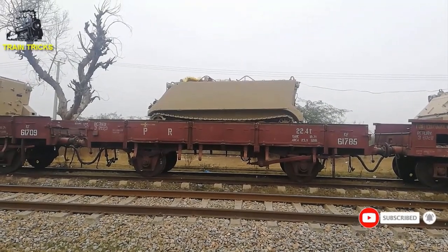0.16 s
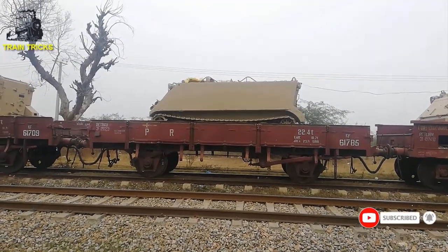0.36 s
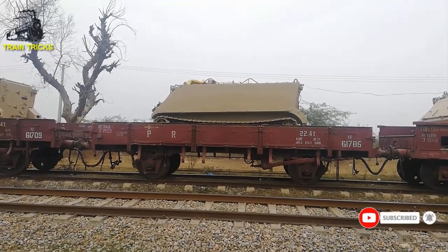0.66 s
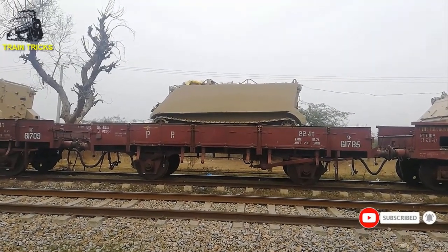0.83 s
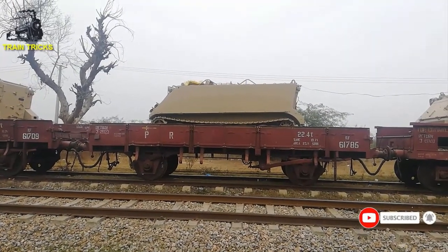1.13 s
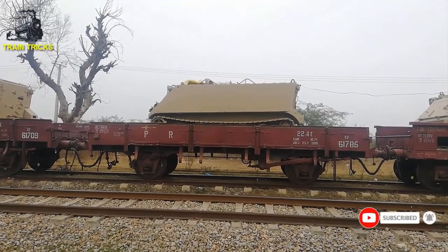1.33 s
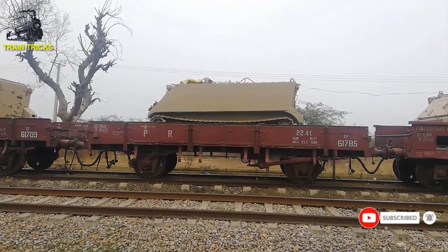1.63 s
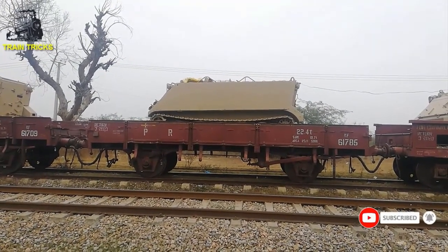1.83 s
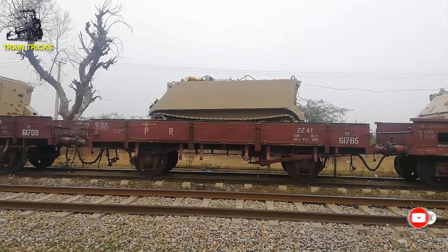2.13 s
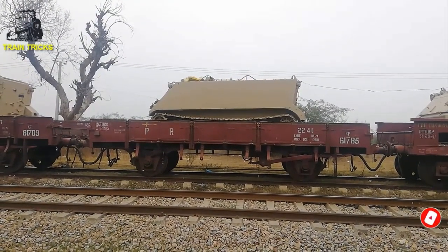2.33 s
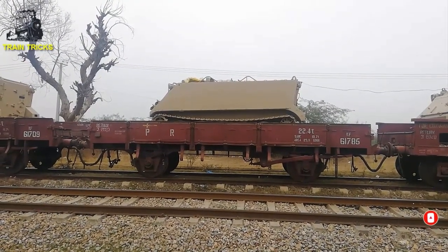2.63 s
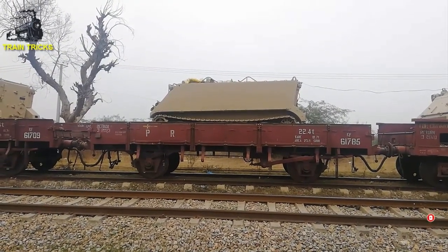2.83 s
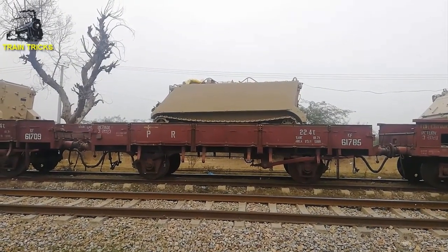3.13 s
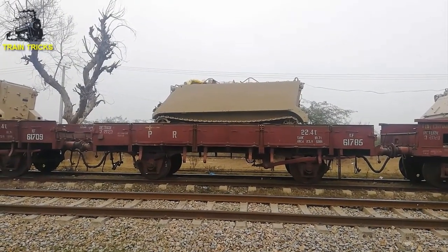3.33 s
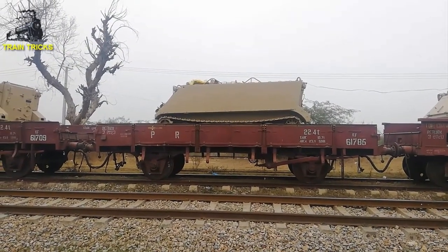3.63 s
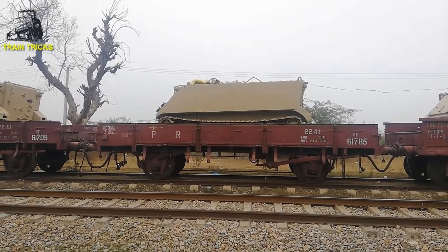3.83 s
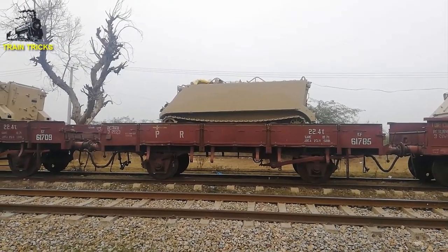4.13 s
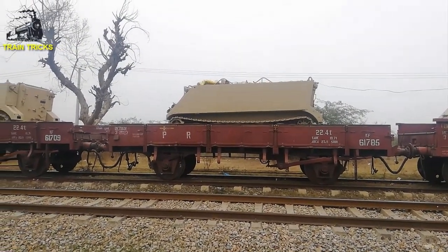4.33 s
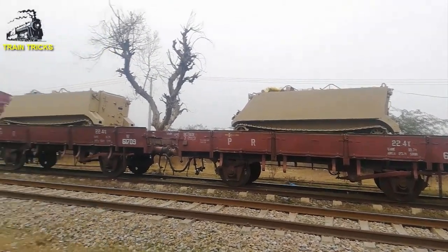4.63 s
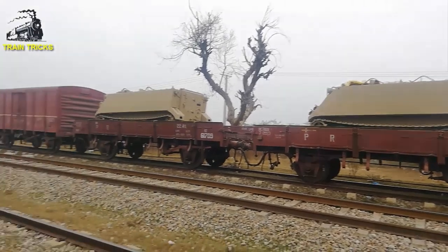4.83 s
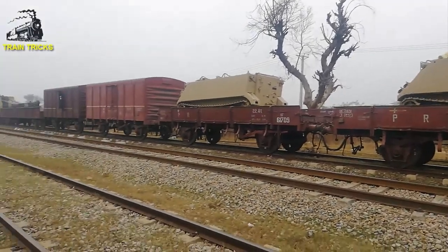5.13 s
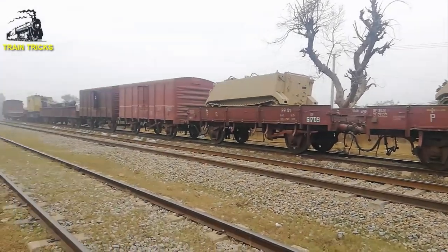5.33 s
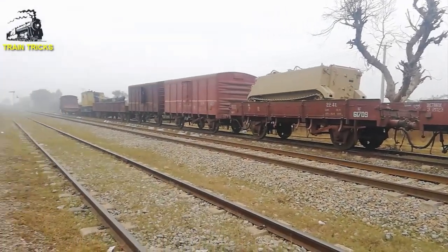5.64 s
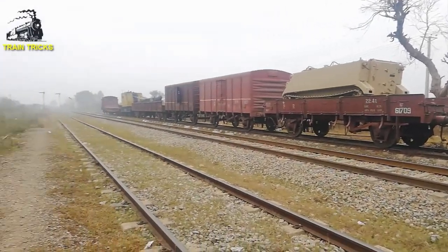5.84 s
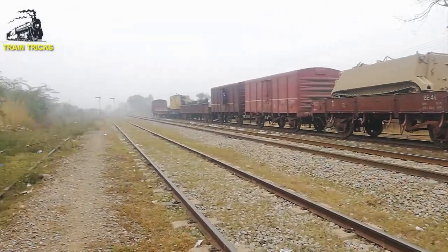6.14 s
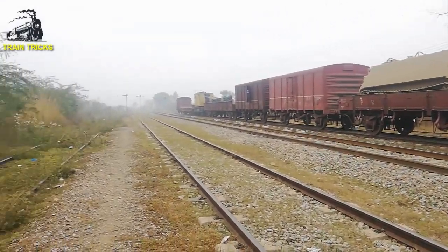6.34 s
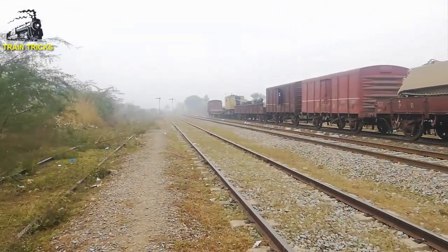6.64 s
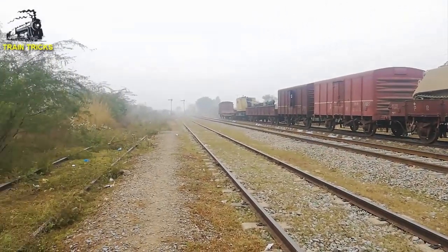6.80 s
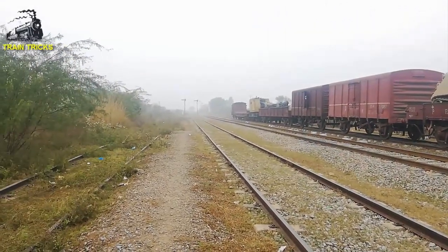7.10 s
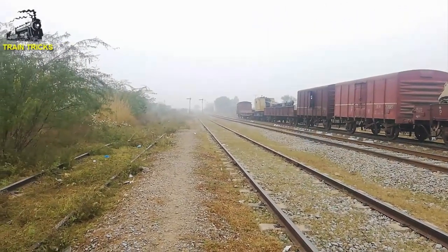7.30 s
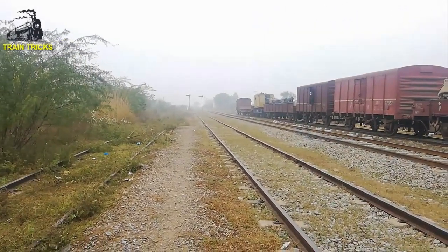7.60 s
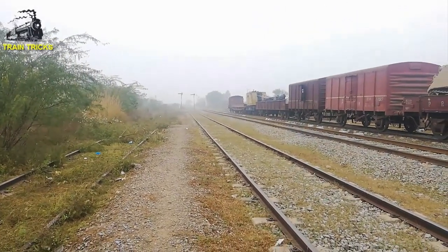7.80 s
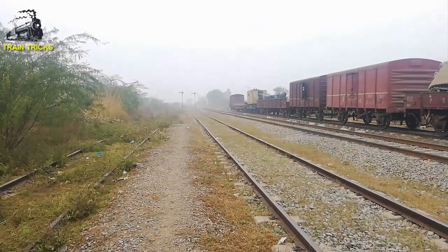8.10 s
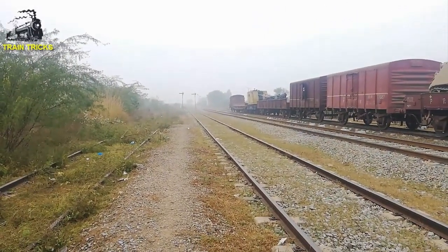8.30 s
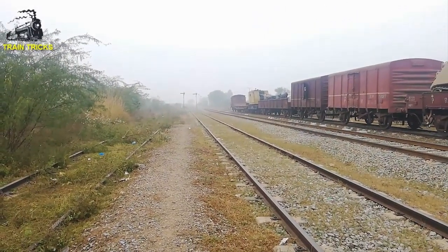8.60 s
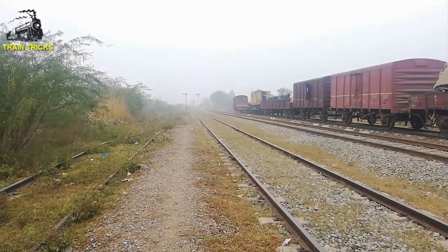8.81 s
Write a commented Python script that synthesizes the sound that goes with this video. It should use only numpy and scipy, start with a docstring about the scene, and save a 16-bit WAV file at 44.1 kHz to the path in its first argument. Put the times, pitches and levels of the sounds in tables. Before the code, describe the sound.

Outdoors beside a standing freight train, a loud burst of brake air hisses out near the start and quickly dies away. Beneath it a far diesel engine throbs steadily, with a slight whine and a faint metallic rattle. A bird chirps faintly twice. Midway, the hand-held microphone gives a sharp knock as it turns, the background shifts slightly in tone, and the idling continues.

```python
"""A goods train stands in a foggy yard; its far diesel throbs, with a thin whine and a rattling part.
Near 1 s a brake valve leaks, then dumps its air: a short turbulent blast that rings on in the pipework
while the valve whistles shut. Soft handling knocks follow, and a far bird chips twice after 3 s.
Near 5 s the hand-held microphone turns from the wagons toward the track with the loudest knock, and
the yard changes colour. Grit ticks underfoot just before and after the turn; the engine idles on."""
import sys
import numpy as np
from scipy import signal
from scipy.fft import rfft, irfft
from scipy.io import wavfile
from scipy.ndimage import uniform_filter1d

SR = 44100
rng = np.random.default_rng(int(sys.argv[2]) if len(sys.argv) > 2 else 0)


def store_wav(level_fs):
    """Save 16-bit WAV to argv[1]."""
    pcm = np.round(np.clip(np.atleast_2d(level_fs), -1, 1) * 32767)
    wavfile.write(sys.argv[1], SR, pcm.T.astype(np.int16))


N = 395136
TIME = np.arange(N) / SR
HZ = np.fft.rfftfreq(N, 1 / SR)

# Spectral levels are relative. "wagons" and "track" are the two headings of the microphone.
# Spectrum of the yard's wash: freq_hz, wagons_left_db, wagons_right_db, track_left_db, track_right_db
YARD_SPECTRUM = [(20, -83, -75, -74, -70), (67, -67, -65.5, -63, -56), (133, -73.5, -68.5, -64, -69),
                 (208, -71.5, -68.5, -78, -78), (470, -83, -80, -91, -80), (890, -82, -74, -81.5, -80),
                 (1207, -84.5, -82.5, -90, -89.5), (1766, -85.5, -88, -90, -89),
                 (2780, -95, -95.5, -98, -95), (5140, -91, -94, -99.5, -99),
                 (6540, -95.5, -99.0, -99, -101), (7430, -100.8, -108.9, -102.8, -107.1),
                 (11200, -110.6, -112.9, -112.0, -113.3), (14800, -116.7, -117.0, -117.0, -117.3)]
# Its resonances: centre_hz, width_hz, wagons_left_db, wagons_right_db, track_left_db, track_right_db
YARD_RESONANCES = [(290, 60, -1.5, -2.5, -3, -1), (430, 110, 0.5, 3, 12, -1.5), (494.5, 17, -4, 6.5, 12, 7),
                   (558, 61, 12.5, 4, 14.5, 3), (633, 66, -27, 2.5, -13, 3.5), (1073, 53, 7.5, 0.5, 2.5, 5),
                   (1450, 720, 4, -2.5, 0, -1.5), (1845, 94, -1.5, 3.5, 3.5, 5.5),
                   (2400, 340, 3, 5, 5, 1.5), (3016, 110, 2, 9, 6, 2.5), (3270, 140, 1.5, 5.5, -11, 0.5),
                   (4250, 540, -1, 6, -3, 13), (5150, 570, -11.5, -8, -5, 1), (6100, 260, -4.5, -3, 4.5, 8),
                   (7200, 180, -5, -4, 1, -3), (7600, 50, 10, 7, 5, -1), (9300, 480, 5, 1, -2, 8)]
# Likeness of diffuse sound at left and right: freq_hz, coherence
DIFFUSE_COHERENCE = [(70, 1), (130, .98), (290, .88), (640, .55), (1400, .3), (3000, .2), (15000, .1)]
# Phase by which left leads for the engine and the yard: freq_hz, wagons_rad, track_rad
IDLE_LEAD = [(0, 0, 0), (40, -.09, -.075), (85, -.2, -.16), (170, -.48, -.12), (260, -.85, -.2),
             (345, -1.2, -.6), (430, -1.8, -1), (560, -2.2, -2.3), (800, -1.55, -2.7), (1000, -1.6, -1.75),
             (1400, -1.6, -1.9), (1700, -2.9, -3.2), (2400, -4, -4.3), (3300, -6.1, -5.8),
             (4200, -7.4, -3.6), (6100, -4.3, -5.3), (7200, -5.7, -7.1)]
# Chips of a far bird: start_s, level_db, start_pitch_hz
BIRD_CHIPS = [(3.01, -54, 3850), (3.83, -56.5, 3700)]
# Ticks of grit: start_s, level_db, decay_s
GRIT_TICKS = [(4.635, -66, 0.003), (6.431, -68, 0.014)]
# Handling knocks: start_s, level_db, pitch_hz, rise_cycles, left_minus_right_db, left_delay_s
HANDLING_KNOCKS = [(2.464, -38.5, 520, 1.5, -.5, 0), (3.582, -37.5, 560, .9, -2.5, 0),
                   (4.9354, -23.2, 910, .62, -8.5, .00078), (5.274, -41, 1050, 1, -2.5, 0),
                   (7.261, -43, 950, 1.6, -4, 0), (7.518, -42.5, 1150, 1.6, -.5, 0)]
# Whine of the auxiliaries: pitch_hz, wagons_left_db, wagons_right_db, track_left_db, track_right_db
WHINE_TONES = [(748.3, -56, -60.5, -62, -60), (1497, -57, -67, -64.5, -68.5), (1556, -64, -73, -71, -73),
               (815, -62, -62, -72, -72), (932, -63, -63, -75, -75), (436, -70, -70, -63, -63),
               (775, -72, -72, -66, -66)]
# Hums that keep their own pace beside the engine: pitch_hz, level_db, waver_fraction
HUM_TONES = [(68, -48, .018), (218.9, -58.5, .0015)]
# Level of the loose part's rattle, clearer after the turn: time_s, level_db
RATTLE_LEVEL = [(0, -68), (5.7, -72.5), (6.9, -65.5), (8.9, -66)]
# Smooth bed of engine orders (harmonics of the engine cycle): freq_hz, level_db
ORDER_BED = [(12, -80), (20, -65), (34, -55.5), (44, -56.5), (50, -63), (62, -56.5), (78, -56.5), (90, -62),
             (112, -61), (135, -64), (165, -65.5), (200, -63.5), (240, -69.5), (285, -75), (335, -71.5),
             (400, -78.2), (520, -83.4)]
# A cycle's two revolutions are nearly alike, so even orders rise and odd ones sink: freq_hz, lift_db
EVEN_ORDER_LIFT = [(60, 0), (120, 2), (330, 2), (520, 1)]
# Engine orders that stand out: order_number, level_db
STRONG_ORDERS = [(11, -53.3), (12, -55.5), (13, -48.7), (19, -46.2), (20, -51), (23, -49.7), (24, -45),
                 (30, -44), (43, -49.3), (47, -50.2), (52, -55), (53, -54), (60, -55), (62, -54.5),
                 (68, -54.2), (70, -55.5), (78, -56), (80, -59), (84, -60.3), (88, -57.3), (104, -58.5),
                 (108, -56.2), (110, -58.5), (124, -59.3), (128, -51.3), (132, -55), (144, -65), (150, -64),
                 (158, -67.4), (174, -64.3), (178, -66), (181, -65), (184, -67), (239, -68.3), (240, -73.1),
                 (252, -76.4), (256, -76.0), (267, -75.3), (268, -76.7), (280, -69.8)]
# Ringing of the emptied pipe: centre_hz, width_hz, gain_db
TAIL_RESONANCES = [(1850, 440, 19), (3300, 260, 17), (3950, 370, 23), (5200, 602, 8), (6500, 400, 7),
                   (7060, 400, 10), (9420, 250, -3), (13000, 4000, 2)]
# Broad spectrum of the leak: freq_hz, level_db
LEAK_SPECTRUM = [(300, -25), (1500, -1), (2900, -8), (4000, 1), (5100, 1), (7000, 1), (8000, -4),
                 (9200, -1), (11000, -4), (15500, -9)]
# Whistles of the narrow valve gap: centre_hz, width_hz, gain_db
GAP_RESONANCES = [(1860, 280, 20), (3380, 380, 10), (3820, 160, 12), (4210, 240, 19.5), (5700, 400, 6),
                  (6200, 480, 10), (7000, 480, 12), (8650, 600, 8)]
# Whistles of the valve as it seats: centre_hz, width_hz, gain_db
SEAT_RESONANCES = [(1980, 200, 3), (3980, 300, -6), (9450, 230, -3)]
# Broad spectrum of the jet: freq_hz, left_db, right_db
JET_SPECTRUM = [(120, -70, -70), (195, -61.5, -67), (245, -55, -55), (278, -67, -63), (333, -56, -55),
                (480, -71.5, -70), (650, -70, -69.5), (855, -67, -72.5), (1170, -64.5, -65.5),
                (1470, -62, -77), (2160, -59, -64.5), (2850, -64, -69), (3750, -61.5, -62.5),
                (4430, -57.5, -56.5), (5050, -62, -61), (5800, -57.5, -61.5), (7060, -58.5, -61),
                (8100, -62.5, -70), (9550, -61, -78), (10700, -69, -77), (15500, -72.5, -84)]
# Resonances of the vent pipe and underframe: centre_hz, width_hz, left_db, right_db
PIPE_RESONANCES = [(240, 26, 6, 4.5), (334, 60, 4, 4), (775, 105, 1.5, 11), (1455, 110, 4, 11),
                   (2320, 90, 3, 2), (2830, 150, 0.5, 7), (3160, 290, 1.5, 7.5), (3700, 70, 1.5, 6),
                   (4220, 130, 3, 0), (4320, 150, -2, 3.5), (5250, 220, -2, -5), (6120, 91, -3, 4),
                   (6600, 150, 2, -6), (8580, 200, 3.5, 4), (9450, 260, 4, 1)]
# Likeness of the jet at left and right: freq_hz, coherence
JET_COHERENCE = [(100, 0.34), (500, 0.94), (1500, 0.29), (2500, 0.27), (3300, 0.45), (4400, 0.54),
                 (5300, .2), (7500, 0.85), (10000, .15), (15000, .1)]
# Phase by which left leads for the jet: freq_hz, lead_rad
JET_PHASE_LEAD = [(60, -1.1), (300, -1.74), (1900, -1.04), (2700, 1.1), (3600, 0.15), (4300, -0.85),
                  (5000, 0.66), (5600, 1.4), (6500, 1.85), (9000, 1.7)]

CYCLE_HZ = 1.83312  # engine cycles per second
# The valve cracks and leaks, starts to open, stands wide open, starts to shut.
CRACK_S, OPEN_S, WIDE_S, SHUT_S = 0.933, 1.0465, 1.135, 1.385


def amp(db):
    """Converts decibels to an amplitude ratio."""
    return 10 ** (np.asarray(db) / 20)


def unit_rms(x):
    """Normalises a signal to rms 1."""
    return x / np.sqrt(np.mean(x ** 2) + 1e-20)


def ramp(start_s, end_s):
    """Linear rise from 0 to 1 between two times."""
    return np.clip((TIME - start_s) / (end_s - start_s), 0, 1)


def since(start_s):
    """Seconds elapsed since start_s, 0 before it."""
    return np.maximum(TIME - start_s, 0)


def spectrum(table, hz=HZ):
    """Interpolates each column of a table on a log-frequency axis."""
    freq_hz, *columns = np.transpose(table)
    return np.array([np.interp(np.log(hz + 1), np.log(freq_hz + 1), column) for column in columns])


def resonance(centre_hz, width_hz):
    """Lorentzian resonance curve of height 1."""
    return 1 / (1 + (2 * (HZ - centre_hz) / width_hz) ** 2)


def peaks_db(table):
    """Resonance curves summed in decibels, one row per gain column."""
    return sum(np.array(db)[:, None] * resonance(hz, width_hz) for hz, width_hz, *db in table)


def above(hz):
    """High-pass gain of a smooth crossover at hz."""
    return 1 - 1 / (1 + (HZ / hz) ** 4)


def drift(rate_hz):
    """Random modulation: low-passed noise of rms 1."""
    noise = rfft(rng.standard_normal(N))
    return unit_rms(irfft(noise * np.exp(-(HZ / rate_hz) ** 2) * (HZ > 0), N))


def comb_ripple(spread_s):
    """Interference of near reflections: fine spectral peaks and dips of rms 1 on each side."""
    reflections = rng.standard_normal((2, N)) * np.exp(-TIME / spread_s) * (TIME > .002)
    return unit_rms(rfft(reflections).real)


def noise_pair(coherence_table, lead_table):
    """Partly coherent white noise at 0 dB per Hz: left and right spectra for each lead column."""
    left, independent = rfft(rng.standard_normal((2, N))) * np.sqrt(SR / 2)
    coherence = np.clip(spectrum(coherence_table)[0], -1, 1)
    right = coherence * left + np.sqrt(1 - coherence ** 2) * independent
    return np.vstack([(left, right * np.exp(-1j * lead)) for lead in spectrum(lead_table)])


def add(mix, start_s, sound):
    """Superposes a stereo sound on the mix at start_s."""
    part = mix[:, round(start_s * SR):][:, :sound.shape[1]]
    part += sound[:, :part.shape[1]]


def heading(middle_s=4.89, length_s=0.46, before=0.056, after=0.63):
    """One smooth swing of the microphone, on a scale from 0 (wagons) to 1 (track)."""
    swing = np.sin(np.pi / 2 * ramp(middle_s - length_s / 2, middle_s + length_s / 2)) ** 2
    return before + (after - before) * swing


def turned(pairs, turn):
    """Directional pickup: crossfades the stereo pair facing the wagons into that along the track."""
    return pairs[:2] * (1 - turn) + pairs[2:] * turn


def sweep(wash, middle_s=4.97, half_s=0.38, gain_db=4.5, from_hz=1700, to_hz=2250, width_hz=630):
    """Moving band-pass: as the microphone turns, one band of the wash swells and slides upward."""
    centre_hz = from_hz + (to_hz - from_hz) * ramp(middle_s - half_s, middle_s + half_s)
    carrier = np.exp(2j * np.pi * np.cumsum(centre_hz) / SR)
    window = np.exp(-(2 * np.fft.fftfreq(N, 1 / SR) / width_hz) ** 2)
    band = 2 * (carrier * np.fft.ifft(np.fft.fft(wash / carrier) * window)).real
    swell_db = gain_db * np.exp(-((TIME - middle_s) / half_s) ** 2 / 2)
    return wash + band * (amp(swell_db) - 1)


def yard(turn, treble_hz=2800, swell_db=0.65, clatter_db=0.32):
    """Diffuse field of distant machinery and open air; its colour depends on the heading."""
    comb_db = np.tile(1.4 * comb_ripple(.012), (2, 1))
    colour = amp(spectrum(YARD_SPECTRUM) + peaks_db(YARD_RESONANCES) + comb_db) * above(13)
    both_headings = irfft(noise_pair(DIFFUSE_COHERENCE, IDLE_LEAD) * colour, N)
    field = rfft(turned(both_headings, turn))
    mid = field.mean(0)
    field = mid + (field - mid) * above(150)  # deep bass reaches both sides alike
    high = irfft(field * above(treble_hz), N)
    low = irfft(field, N) - high
    level_db = np.interp(turn, [0, 1], [0.96, 1.5])
    treble_db = np.interp(turn, [0, 1], [-0.26, -2.5])
    wash = low * amp(clatter_db * drift(24)) + high * amp(treble_db)
    return sweep(wash) * amp(level_db + swell_db * drift(18))


def bird(length_s=0.074, fall_fraction=0.11):
    """Falling glides; random amplitude modulation blurs them as distance does."""
    out, t = np.zeros((2, N)), np.arange(0, length_s, 1 / SR)
    for start_s, level_db, start_hz in BIRD_CHIPS:
        pitch_hz = start_hz * (1 - fall_fraction * t / length_s)
        chip = np.sin(2 * np.pi * np.cumsum(pitch_hz) / SR) * np.hanning(len(t))
        blur = unit_rms(uniform_filter1d(rng.standard_normal((2, len(t))), size=120))
        add(out, start_s, amp(level_db) * chip * blur)
    return out


def grit(low_hz=6500, left_db=4):
    """Grit snaps underfoot: bright noise transients with exponential decay."""
    envelope = sum((TIME > start_s) * amp(level_db) * np.exp(-since(start_s) / decay_s)
                   for start_s, level_db, decay_s in GRIT_TICKS)
    hiss = unit_rms(irfft(rfft(rng.standard_normal((2, N))) * above(low_hz), N))
    return hiss * envelope * amp([[left_db], [0]])


def knocks(thud_db=-7, thud_s=0.00056, snap_db=-17, snap_s=0.00066):
    """Heavily damped vibration: the grip shifts on the case, with a dull push and a faint snap."""
    out, t = np.zeros((2, N)), np.arange(SR // 40) / SR
    for start_s, level_db, pitch_hz, rise_cycles, pan_db, delay_s in HANDLING_KNOCKS:
        age_s = np.maximum(t - [[delay_s], [0]], 0)
        ring_age, thud_age = age_s * pitch_hz / rise_cycles, age_s / thud_s  # 1 at each envelope's peak
        ring = -(ring_age * np.exp(1 - ring_age)) ** 2 * np.sin(2 * np.pi * pitch_hz * age_s)
        thud = amp(thud_db) * (thud_age * np.exp(1 - thud_age)) ** 2
        snap = amp(snap_db) * rng.standard_normal(len(t)) * np.exp(-t / snap_s)
        gain = amp([[level_db + pan_db / 2], [level_db - pan_db / 2]])
        add(out, start_s, gain * (ring + thud + uniform_filter1d(snap, size=4)))
    return out


def whine(turn, waver=.0017):
    """Pure tones of the auxiliaries, modulated in pitch and level on their way through the air."""
    out = np.zeros((2, N))
    for pitch_hz, *db in WHINE_TONES:
        level_db = turned(np.array(db)[:, None], turn)
        phase = 2 * np.pi * np.cumsum(pitch_hz * (1 + waver * drift(9.3))) / SR
        fading = 1 + .36 * drift(18)
        out += np.sqrt(2) * amp(level_db) * fading * np.sin([phase, phase + np.pi / 2])
    return out


def hums():
    """Beating: a deep drone and a thinner hum waver slowly against the engine's orders."""
    out = np.zeros((2, N))
    for pitch_hz, level_db, waver in HUM_TONES:
        phase = 2 * np.pi * np.cumsum(pitch_hz * (1 + waver * drift(2))) / SR
        lead = spectrum(IDLE_LEAD, pitch_hz)[0]
        out += np.sqrt(2) * amp(level_db) * np.sin([phase, phase - lead])
    return out


def rattle(ring_hz=7050, width_hz=460, decay_s=0.019, uneven_db=1.6, tremble_db=-10, calm_db=-10):
    """Forced vibration: each firing jolts a loose metal part, hardest in one stretch of the cycle."""
    firings_per_cycle = 12
    first_firing, stretch_middle, stretch_length = .075, .54, .52  # fractions of a cycle
    cycles = TIME * CYCLE_HZ
    age_cycles = (cycles - first_firing) % (1 / firings_per_cycle)
    rattling = abs((cycles - age_cycles) % 1 - stretch_middle) < stretch_length / 2
    jolts = amp(calm_db * (1 - rattling)) * np.exp(-age_cycles / CYCLE_HZ / decay_s)
    shake = uniform_filter1d(jolts + amp(tremble_db), size=300) * amp(uneven_db * drift(9.1))
    track_noise = noise_pair(DIFFUSE_COHERENCE, IDLE_LEAD)[2:]
    ring = irfft(track_noise * resonance(ring_hz, width_hz), N)
    level_db = np.interp(TIME, *np.transpose(RATTLE_LEVEL))
    return unit_rms(ring * shake) * amp(level_db)


def throb(cycle, hz, width_hz, gain_db, swing_db, peak_at, swells=1):
    """Amplitude modulation of one exhaust band; peak_at is a crest's place as a fraction of the cycle."""
    size = cycle.shape[1]
    order_hz = np.arange(size // 2 + 1) * CYCLE_HZ
    band = irfft(rfft(cycle) * np.exp(-(2 * (order_hz - hz) / width_hz) ** 2), size)
    swing = np.cos(2 * np.pi * swells * (np.arange(size) / size - peak_at))
    return cycle + band * (amp(gain_db + swing_db * swing) - 1)


def diesel(wander=0.00092, unsteady_db=0.5, size=32768, order_count=300):
    """Harmonic series: one uneven engine cycle repeats and throbs; a stereo pair for each heading."""
    orders = np.arange(order_count)
    order_hz = orders * CYCLE_HZ
    lift_db = spectrum(EVEN_ORDER_LIFT, order_hz)[0] * (-1) ** orders
    level = amp(spectrum(ORDER_BED, order_hz)[0] + lift_db) * (order_hz > 10)
    for order, level_db in STRONG_ORDERS:
        level[round(order)] = amp(level_db)
    phase = rng.uniform(0, 2 * np.pi, order_count)
    side_phases = np.vstack([(phase, phase - lead) for lead in spectrum(IDLE_LEAD, order_hz)])
    cycle = irfft(level * np.exp(1j * side_phases), size) * size / np.sqrt(2)
    # Swells once a revolution, and on every second firing.
    cycle = throb(cycle, hz=204, width_hz=45, gain_db=3, swing_db=-0.5, peak_at=0.25, swells=2)
    cycle = throb(cycle, hz=54.7, width_hz=47, gain_db=-0.5, swing_db=4, peak_at=0.16, swells=6)
    # Once a cycle: the deep heave, the answering beat and its hollow overtone.
    cycle = throb(cycle, hz=34, width_hz=14, gain_db=0, swing_db=6, peak_at=0.26)
    cycle = throb(cycle, hz=70, width_hz=22, gain_db=2, swing_db=2.5, peak_at=0.91)
    cycle = throb(cycle, hz=350, width_hz=76, gain_db=0.5, swing_db=5.5, peak_at=0.73)
    cycles = np.cumsum(CYCLE_HZ * (1 + wander * drift(1.32))) / SR
    exhaust = np.array([np.interp(cycles % 1, np.arange(size) / size, side) for side in cycle])
    return exhaust * amp(unsteady_db * drift(6.4))


def ducking(loud, knee_db=-37):
    """Compression: a gain that sinks half a decibel for each decibel of the sound above the knee."""
    power = uniform_filter1d((loud ** 2).mean(0), size=2000)
    power_db = 10 * np.log10(abs(power) + 1e-12)
    return amp(-.5 * np.maximum(power_db - knee_db, 0))


def after_ring(air, level_db=-28, t60_s=1.13, dull_hz=7000):
    """Reverberation: the sound of the air lingers in the pipework and between the wagons."""
    tail = rng.standard_normal((2, N)) * amp(-60 * TIME / t60_s) * (TIME > .03)
    tail /= np.linalg.norm(tail[0])
    colour = amp(level_db + peaks_db(TAIL_RESONANCES)) / np.hypot(1, HZ / dull_hz)
    return irfft(rfft(air) * rfft(tail) * colour, N)


def seating(peak_s=1.47, fade_s=0.097, level_db=-55, left_db=3):
    """Flow-excited resonance: the last air whistles through the narrowing gap as the valve seats."""
    colour = sum(amp(db) * resonance(hz, width_hz) for hz, width_hz, db in SEAT_RESONANCES)
    whistle = unit_rms(irfft(noise_pair(JET_COHERENCE, JET_PHASE_LEAD) * colour, N))
    flow = np.exp(-((TIME - peak_s) / fade_s) ** 2)
    return whistle * flow * amp(level_db) * amp([[left_db], [0]])


def leak(level_db=-42, rise_s=0.037, left_db=2):
    """Orifice noise: air whistles through the barely open valve until the gap widens for the blast."""
    colour = amp(spectrum(LEAK_SPECTRUM) + peaks_db(GAP_RESONANCES))
    whistle = unit_rms(irfft(noise_pair(JET_COHERENCE, JET_PHASE_LEAD) * colour, N))
    flow = (1 - np.exp(-since(CRACK_S) / rise_s)) * (1 - ramp(OPEN_S, WIDE_S))
    return whistle * flow * amp(level_db) * amp([[left_db], [0]])


def blast(boom_hz=550, roar_hz=2400, sizzle_hz=10500, flutter_db=0.5, flutter_hz=90):
    """A turbulent jet excites the vent pipe's modes; pressure surges and drains, then the valve shuts."""
    surge_db, surge_s, roar_full_s, boom_rise_s = 3, 0.036, 1.18, 0.03
    drain_db_per_s, shut_db_per_s, roar_db_per_s, sizzle_db_per_s = 29.5, 75, 35, 30
    draining_s, shutting_s = since(WIDE_S), since(SHUT_S)
    jet_db = 1 + surge_db * np.exp(-draining_s / surge_s)
    jet_db -= drain_db_per_s * draining_s + shut_db_per_s * shutting_s
    # The low roar needs full pressure, so it comes late and drains faster.
    roar_db = 2.5 - 11 * (1 - ramp(OPEN_S, roar_full_s))
    roar_db -= roar_db_per_s * (since(roar_full_s) - shutting_s)
    sizzle_db = -0.2 - sizzle_db_per_s * shutting_s  # dies first as the valve shuts
    boom_db = -3.5 + 0.58 * jet_db  # the low push follows the jet's level only in part
    colour = amp(spectrum(JET_SPECTRUM) + peaks_db(PIPE_RESONANCES) + 1.7 * comb_ripple(.015))
    jet = noise_pair(JET_COHERENCE, JET_PHASE_LEAD) * colour
    boom = irfft(jet * (1 - above(boom_hz)), N)
    roar = irfft(jet * above(boom_hz) * (1 - above(roar_hz)), N)
    sizzle = irfft(jet * above(sizzle_hz), N)
    core = irfft(jet, N) - boom - roar - sizzle
    flow = ramp(OPEN_S, WIDE_S) * amp(jet_db + flutter_db * drift(flutter_hz))
    push = ramp(OPEN_S, OPEN_S + boom_rise_s) * amp(boom_db)
    return flow * (core + amp(roar_db) * roar + amp(sizzle_db) * sizzle) + push * boom


def scene():
    """Superposition: brake air over the idling train and yard, which sink under the blast."""
    turn = heading()
    air = blast() + leak() + seating()
    rumble_db = -1.25 + 0.6 * turn  # fuller along the track
    rumble = (turned(diesel(), turn) + hums()) * amp(rumble_db)
    idle = rumble + whine(turn) + rattle() + yard(turn)
    return air + after_ring(air) + idle * ducking(air) + knocks() + grit() + bird()


def record(dry, edge_hz=15600):
    """Band limiting: a steep low-pass, with short fades at both ends."""
    faded = dry * signal.windows.tukey(N, .001)
    low_pass = signal.firwin(511, edge_hz, window=("kaiser", 9), fs=SR)
    return signal.oaconvolve(faded, low_pass[None], "same")


dry = scene()
out = record(dry)
store_wav(out)
```